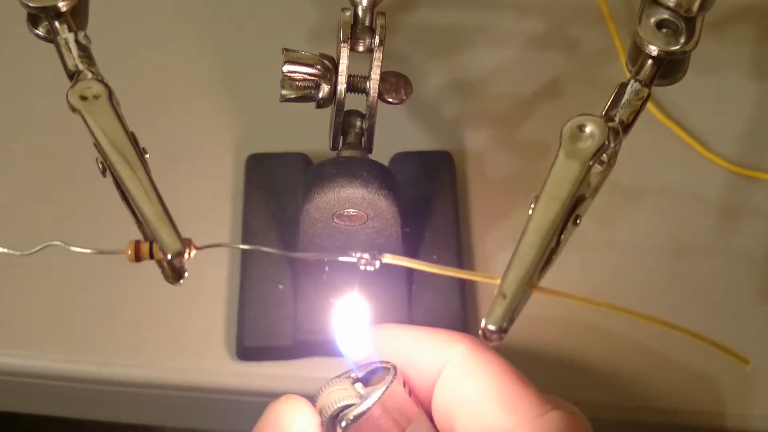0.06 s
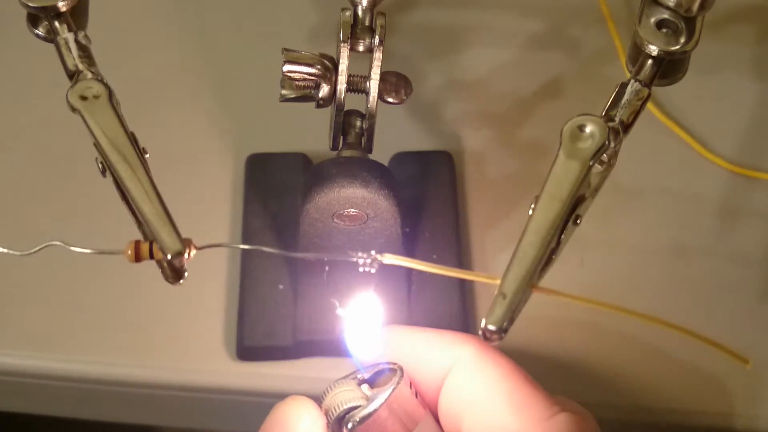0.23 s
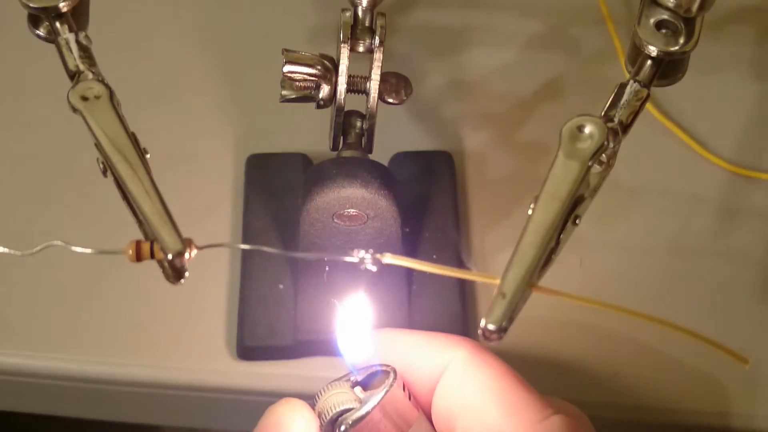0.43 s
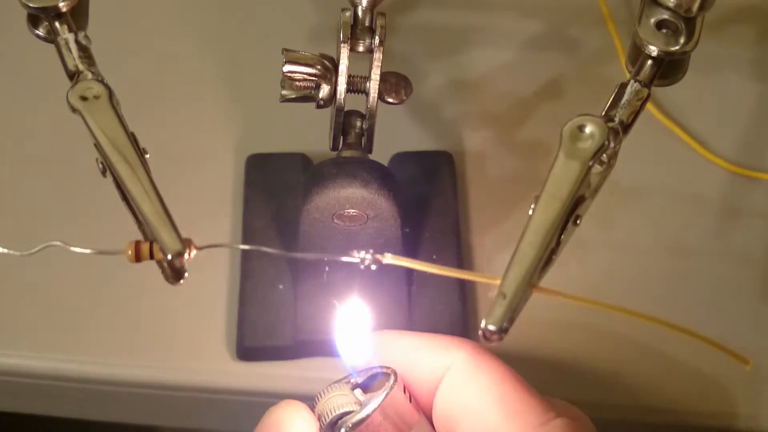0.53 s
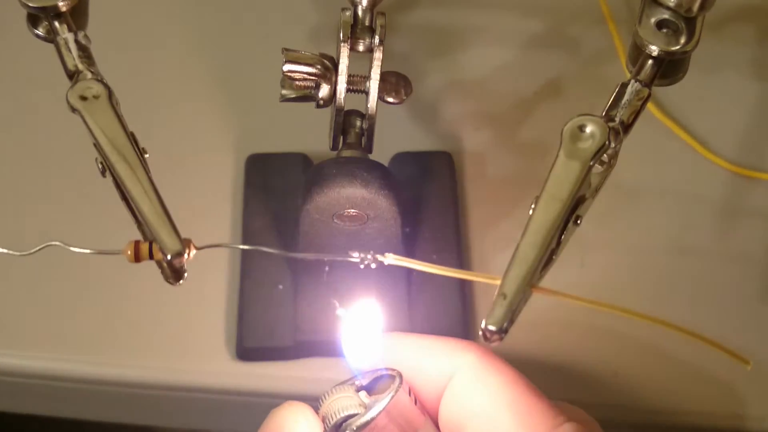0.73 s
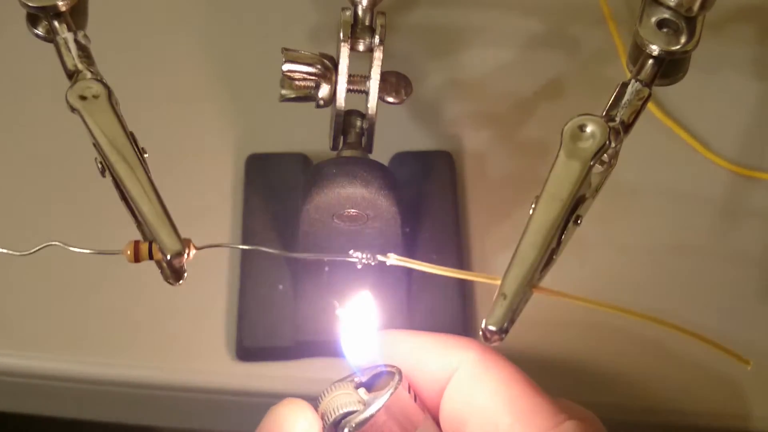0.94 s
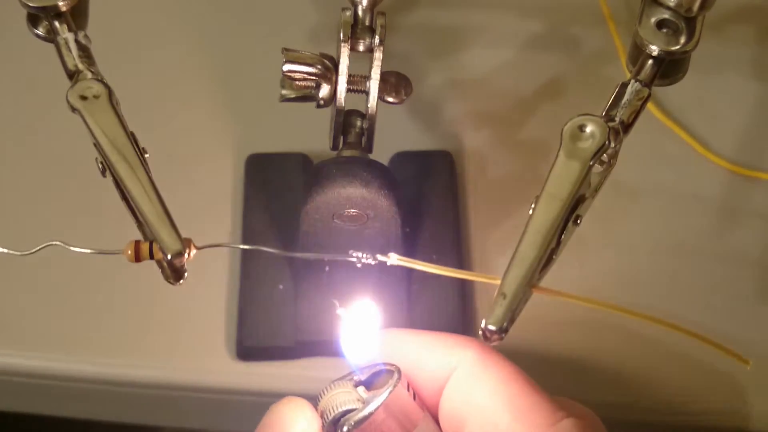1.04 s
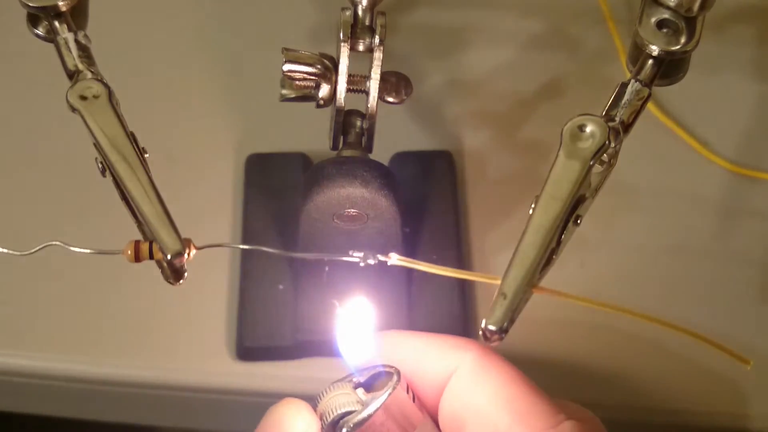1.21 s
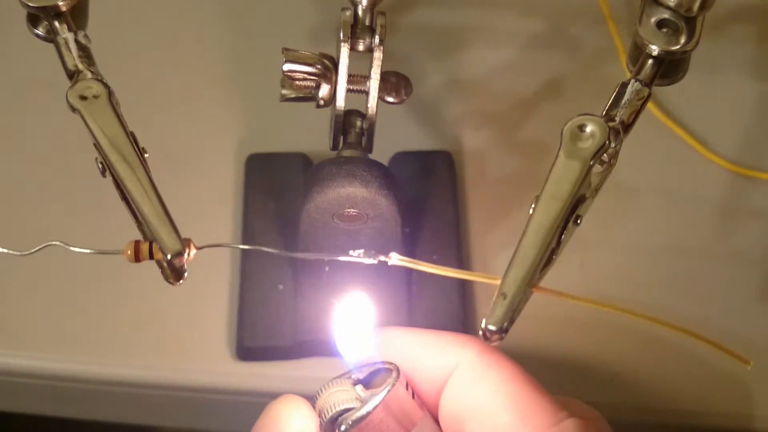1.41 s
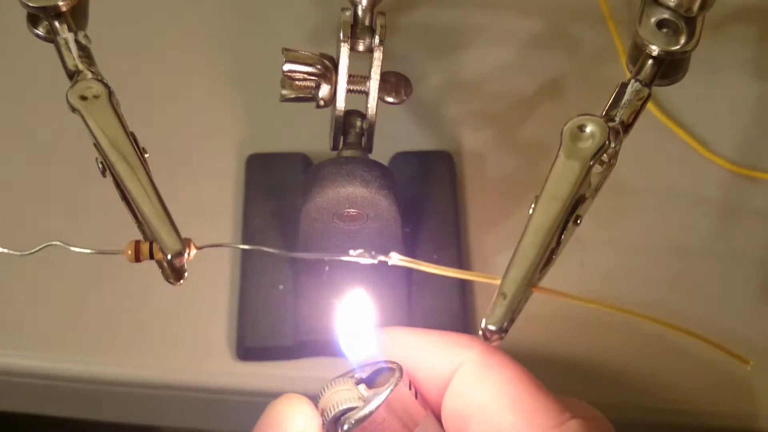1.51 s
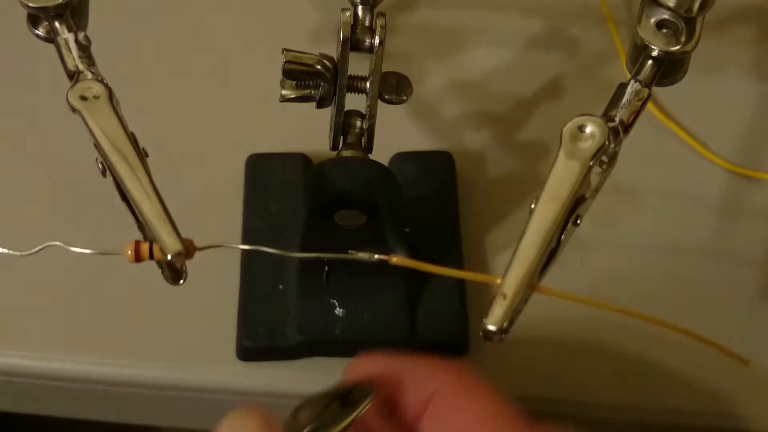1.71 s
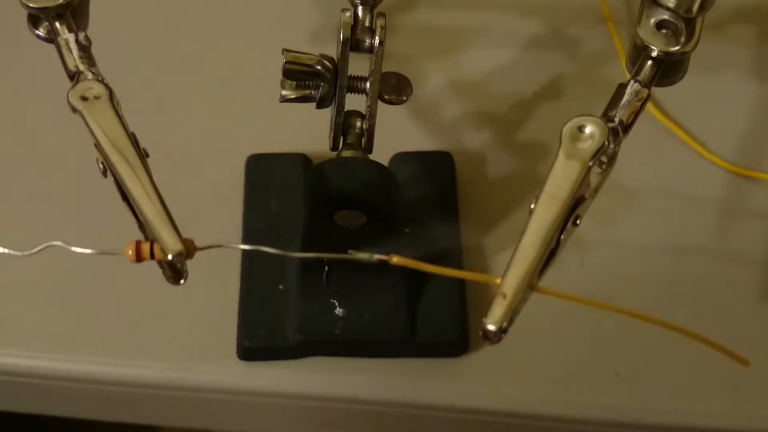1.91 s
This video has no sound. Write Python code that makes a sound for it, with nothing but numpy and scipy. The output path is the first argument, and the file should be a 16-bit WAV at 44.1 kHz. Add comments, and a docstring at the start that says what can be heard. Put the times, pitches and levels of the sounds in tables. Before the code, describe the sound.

One sudden pop from handling a lit lighter sounds close to the microphone, on the left. Quiet room hiss and a soft draught follow, until the gas lever shuts with a small click and the lighter ticks once more.

```python
"""A lighter burns under a solder joint, close to the microphone in a quiet room.
Its gas lever clicks shut, and it clicks once more as the hand takes it away; each click rings its hood.
Before that, a sharp pop, a sudden step in pressure, hits the left microphone.
Moving air rumbles softly, the thumb rubs on the lighter, and a thin, faint hiss sinks in pitch.
Steady hiss and a faint hum lie underneath."""
import sys
import numpy as np
from scipy import signal
from scipy.fft import rfft, irfft
from scipy.io import wavfile

SR = 44100
rng = np.random.default_rng(int(sys.argv[2]) if len(sys.argv) > 2 else 0)


def wrap_up_sound(samples):
    """Save the sound to the file named by the first command line argument, as 16-bit audio."""
    columns = np.atleast_2d(samples).T
    # keep every value between -1 and 1, then stretch to whole-number steps
    tamed = np.clip(columns, -1, 1)
    steps = np.round(tamed * 32767).astype(np.int16)
    wavfile.write(sys.argv[1], SR, steps)


N = 85995
T = np.arange(N) / SR


def from_db(db):
    """Turn decibels into a number to multiply by."""
    return 10 ** (np.asarray(db) / 20)


def rms_one(x):
    """Scale a signal so that its average strength (rms) is 1."""
    return x / np.sqrt(np.mean(x ** 2) + 1e-20)


def in_time(rows):
    """Join a table's points with straight lines, giving a value at every sample."""
    times, *columns = np.transpose(rows)
    return [np.interp(T, times, column) for column in columns]


def butter(x, hz, kind, order=2):
    """Keep the lows, the highs or a band of a sound (a Butterworth filter)."""
    return signal.sosfilt(signal.butter(order, hz, kind, fs=SR, output="sos"), x + 1e-18)


def slow_noise(hz):
    """A random wobble of strength 1, mostly slower than the given rate."""
    return rms_one(butter(rng.standard_normal(N + SR), hz, "low")[SR:])


def stereo_noise(spectrum):
    """Separate noise for left and right, shaped by a table of levels per Hz."""
    hz, *sides = np.transpose(spectrum)
    log_hz = np.log(np.maximum(np.fft.rfftfreq(N, 1 / SR), 1))
    gains = from_db([np.interp(log_hz, np.log(hz), side) for side in sides])
    return irfft(rfft(rng.standard_normal((2, N))) * gains, N) * np.sqrt(SR / 2)


def bump(middle_s, half_s):
    """A smooth rise and fall around a moment."""
    return np.exp(-np.minimum(((T - middle_s) / half_s) ** 2, 40))


def dying(start_s, fade_s):
    """Jump to 1, then fade by 60 dB every fade_s seconds."""
    return (T >= start_s) * np.exp(-np.log(1000) * np.clip((T - start_s) / fade_s, 0, 10))


def ring(start_s, hz, fade_s):
    """One pure tone that is struck and dies away."""
    return dying(start_s, fade_s) * np.sin(2 * np.pi * hz * (T - start_s))


def room(x):
    """The walls send back a short blur of echoes, different for each ear."""
    tails = rng.standard_normal((2, N)) * dying(start_s=.0051, fade_s=.16)
    return np.array([signal.fftconvolve(x, tail / np.linalg.norm(tail))[:N] for tail in tails])


# Room and microphone hiss, from low to high: pitch_hz, left_db_per_hz, right_db_per_hz
ROOM_HISS = [(28, -105, -96), (125, -97, -96.5), (237, -106, -103), (650, -108, -108), (1500, -114, -110.5),
             (3500, -116, -113), (7560, -118, -115.5), (11500, -120.5, -116), (15600, -120.5, -116.5)]
# Mains hum and a faint electronic whine: pitch_hz, level_db
HUM_TONES = [(59.5, -82), (108, -79.5), (7897, -99)]

def background():
    """The room and microphones hiss steadily over a faint electrical hum."""
    hiss = stereo_noise(ROOM_HISS)
    hum = sum(from_db(db) * np.sin(2 * np.pi * (hz * T + rng.random())) for hz, db in HUM_TONES)
    return hiss + np.sqrt(2) * hum


# The air's rumble before it swells and flutters: pitch_hz, left_db_per_hz, right_db_per_hz
AIR_RUMBLE = [(25.6, -92.5, -76), (97, -92, -91), (251.6, -99.5, -97), (508, -110, -107),
              (1080, -114, -111), (3240, -123, -120), (9600, -140, -138)]
# How the draught grows and eases: time_s, gain_db
DRAUGHT_STRENGTH = [(0, 6.5), (.1, -4.5), (.22, 4), (.33, 4.5), (.42, 2), (.48, 0.5), (.57, -3.5),
                    (.78, -8.5), (.84, 1.5), (.94, -1.5), (1.03, 0.5), (1.19, 2), (1.45, -1), (1.67, 2),
                    (1.78, -1), (1.95, 0)]
# Single puffs of air: middle_s, right_level_db
AIR_PUFFS = [(0.031, -50.5), (0.479, -46.5), (1.027, -48.5), (1.183, -49), (1.351, -58), (1.589, -46.5),
             (1.66, -54)]

def moving_air(flutter_db=2.5, flutter_hz=19, puff_left_db=-6):
    """Air rumbles over the microphones, each octave fluttering by itself, and puffs push on them."""
    draught_db, = in_time(DRAUGHT_STRENGTH)
    spectrum = rfft(stereo_noise(AIR_RUMBLE))
    hz = np.fft.rfftfreq(N, 1 / SR)
    octave = np.clip(np.log2(hz / 40 + 1e-9), 0, 6).astype(int)   # counted up from 40 Hz
    rumble = np.zeros((2, N))
    for k in np.unique(octave):
        band = irfft(spectrum * (octave == k), N)
        rumble += band * from_db(flutter_db * slow_noise(flutter_hz))
    puffs = sum(from_db(db) * bump(middle_s, half_s=.006) for middle_s, db in AIR_PUFFS)
    return rumble * from_db(draught_db) + puffs * from_db([[puff_left_db], [0]])


# The path of the thin hiss's lower band: time_s, pitch_hz, left_level_db
HISS_GLIDE = [(0, 5800, -87), (.45, 5500, -87.5), (.8, 5150, -86), (1.0, 4700, -83), (1.17, 4100, -81),
              (1.45, 3900, -83), (1.7, 3600, -81.5), (1.95, 3500, -80.5)]

def thin_hiss(width_hz=1070, upper_ratio=1.7, upper_db=-5, right_db=-6.5):
    """Two narrow bands of hiss glide down together."""
    hz, db = in_time(HISS_GLIDE)
    phase = 2 * np.pi * np.cumsum(hz) / SR
    # Wobbling a tone at random spreads it into a band of hiss.
    lower, upper = [slow_noise(width_hz / 2) * np.cos(p) + slow_noise(width_hz / 2) * np.sin(p)
                    for p in (phase, upper_ratio * phase)]
    return from_db(db) * (lower + from_db(upper_db) * upper) * from_db([[0], [right_db]])


# The thumb's rubs: middle_s, half_length_s, level_db
THUMB_RUBS = [(0.1, 0.021, -78), (0.164, 0.0057, -73), (1.706, 0.011, -75)]

def thumb(band_hz=(4300, 6600)):
    """The thumb shifts on the lighter with short, faint rubs."""
    grit = rms_one(butter(rng.standard_normal((2, N)), band_hz, "band"))
    return grit * sum(from_db(db) * bump(middle_s, half_s) for middle_s, half_s, db in THUMB_RUBS)


def pop(start_s=.2258, left_db=-14.3, right_db=-47.3, ring_hz=4030, ring_width_hz=520):
    """A step in pressure hits the microphone; a high resonance smears its edge and rings briefly."""
    step = 1.0 * (T >= start_s)
    rounded = butter(step, hz=4700, kind="low")
    slow = butter(step, hz=200, kind="low", order=1)
    edge = .28 * step + .28 * rounded + .44 * slow
    # This all-pass filter delays pitches near ring_hz without changing their strength.
    radius = np.exp(-np.pi * ring_width_hz / SR)
    feedback = [1, -2 * radius * np.cos(2 * np.pi * ring_hz / SR), radius * radius]
    smeared = signal.lfilter(feedback[::-1], feedback, edge)
    ping = from_db(-34) * ring(start_s, ring_hz, fade_s=.024)
    return from_db([[left_db], [right_db]]) * (smeared - ping)


# The lighter's two clicks: start_s, gain_db, low_cut_hz, left_minus_right_db, ring_gain_db
LIGHTER_CLICKS = [(1.7136, -45.5, 4520, 4.5, -13), (1.9142, -45, 2300, 9.5, -2)]
# The tiny taps inside one click: delay_s, relative_level_db
CLICK_TAPS = [(0, -3), (.0004, 4.5), (.0012, -8), (.0018, -12), (.0029, -6)]
# The tones of the lighter's metal hood: pitch_hz, relative_level_db, fade_s
HOOD_TONES = [(2770, -3.5, 0.0058), (2940, -21.5, .13), (4000, -24.5, 0.2), (4160, -23.5, 0.29),
              (4840, -14.5, 0.04), (5070, -15, 0.015), (5440, -19.5, 0.042), (6420, -20, 0.085),
              (6800, -12.5, 0.031)]

def lighter(crack_band_hz=(4780, 6580), crack_db=2, high_cut_hz=7600, right_lag_s=.0002, room_db=-11.5):
    """Each click is a quick cluster of sharp taps that sets the metal hood ringing."""
    out = np.zeros((2, N))
    for start_s, gain_db, low_cut_hz, pan_db, ring_db in LIGHTER_CLICKS:
        taps = np.zeros(N)
        for delay_s, db in CLICK_TAPS:
            taps[int((start_s + delay_s) * SR)] += from_db(db) * rng.choice([-1, 1])
        crack = butter(taps, crack_band_hz, "band")
        crack = from_db(crack_db) * crack / np.abs(crack).max()
        hood = np.zeros(N)
        for hz, db, fade_s in HOOD_TONES:
            strength = from_db(db + ring_db + rng.normal(0, 1)) * rng.choice([-1, 1])
            hood += strength * ring(start_s, hz, fade_s)
        click = from_db(gain_db) * butter(crack + hood, [low_cut_hz, high_cut_hz], "band", order=3)
        late_click = np.interp(T - right_lag_s, T, click)
        out += [click * from_db(pan_db / 2), late_click * from_db(-pan_db / 2)]
        out += from_db(room_db) * room(click)
    return out


def scene():
    """All the sounds add up at the two microphones."""
    return pop() + lighter() + thumb() + thin_hiss() + moving_air() + background()


def record(dry, sag_s=.041, limit_db=-20, look_ahead_s=.0035, react_s=.003, cutoff_hz=15900):
    """The microphone lets the pop sag, a limiter flattens its top, and the highest treble is cut."""
    # Two coupling stages pass only changes, so a step sags and swings back.
    corner_hz = 1 / (2 * np.pi * sag_s)
    x = butter(dry, corner_hz, "high", order=1)
    x = butter(x, corner_hz, "high", order=1)
    # The limiter looks ahead and smoothly turns down whatever is too loud.
    over_db = np.maximum(20 * np.log10(np.abs(x) + 1e-9) - limit_db, 0)
    ahead_db = np.maximum(over_db, np.roll(over_db, -int(look_ahead_s * SR), axis=1))
    smoothing = np.exp(-1 / (react_s * SR))
    turn_down_db = signal.lfilter([1 - smoothing], [1, -smoothing], ahead_db)
    treble_cut = signal.ellip(10, .1, 70, cutoff_hz, fs=SR, output="sos")
    return signal.sosfilt(treble_cut, x * from_db(-turn_down_db))


dry = scene()
out = record(dry)
wrap_up_sound(out)
```